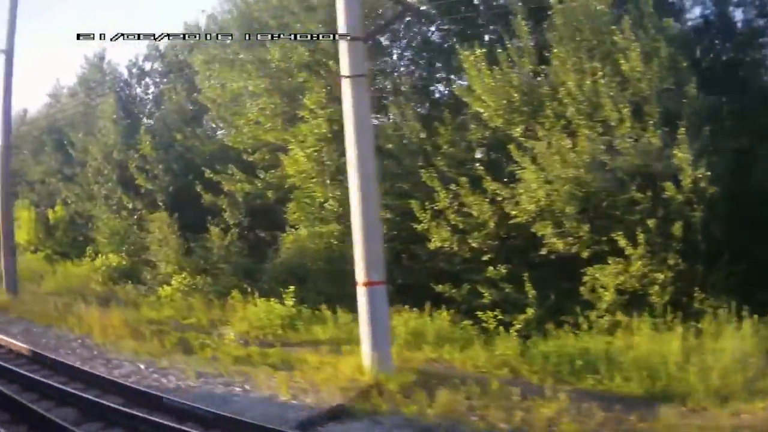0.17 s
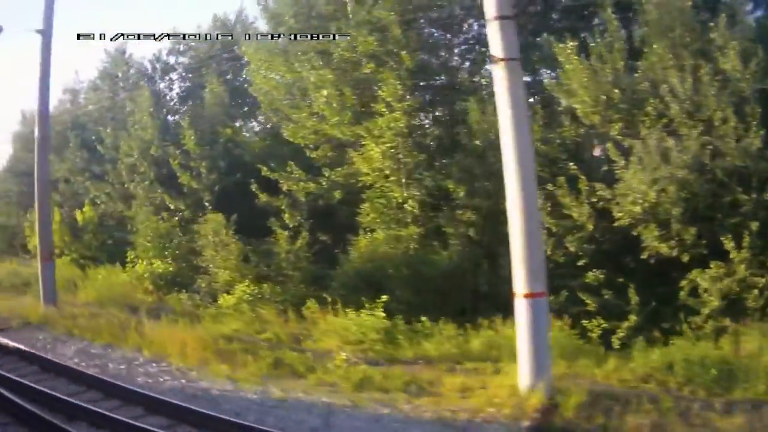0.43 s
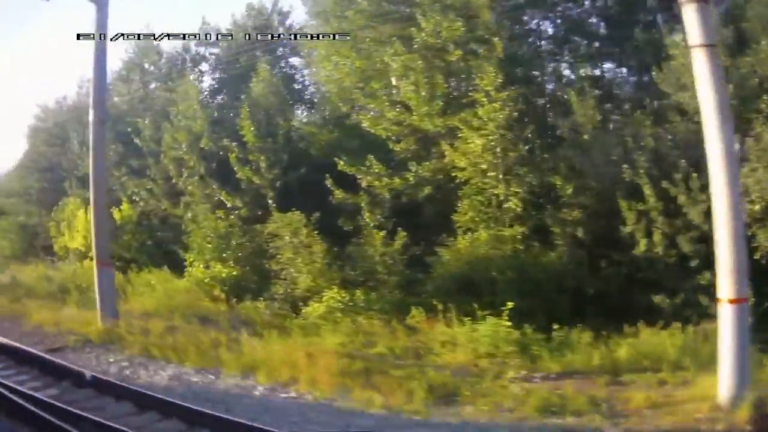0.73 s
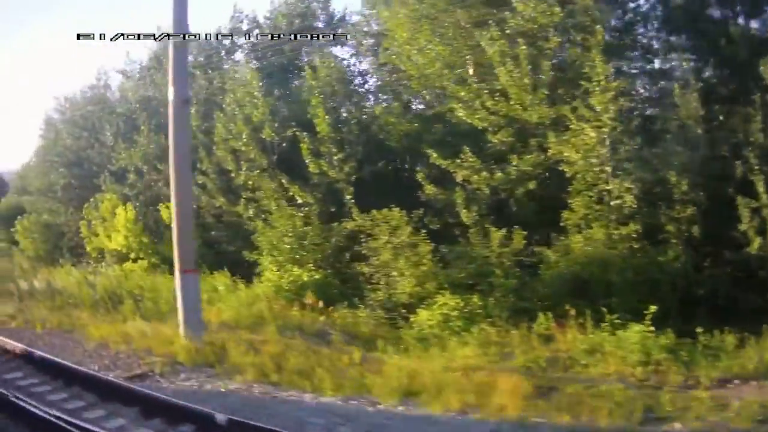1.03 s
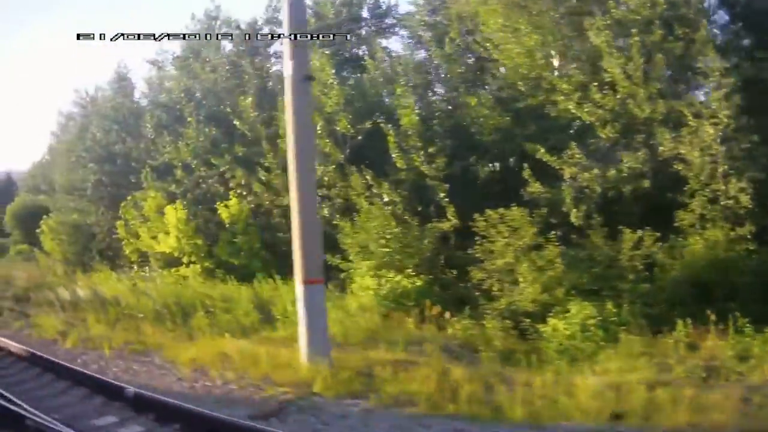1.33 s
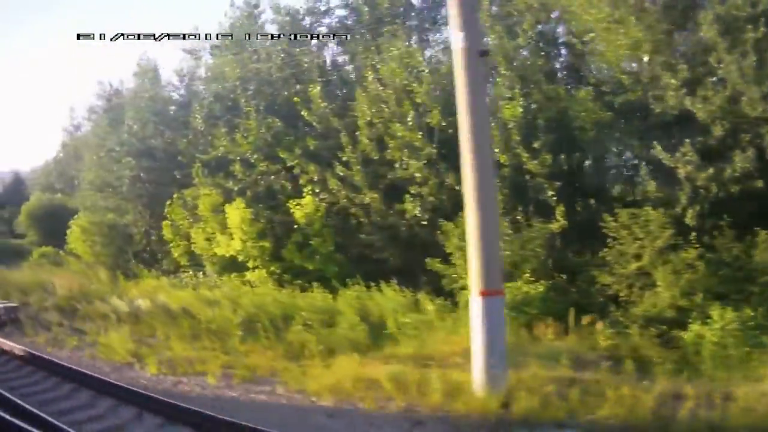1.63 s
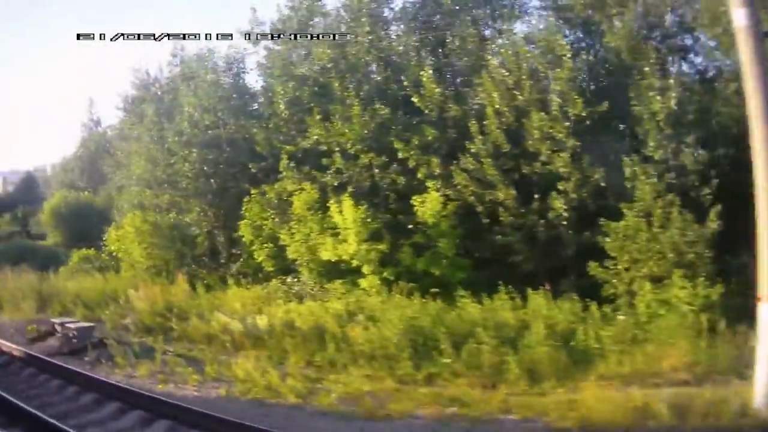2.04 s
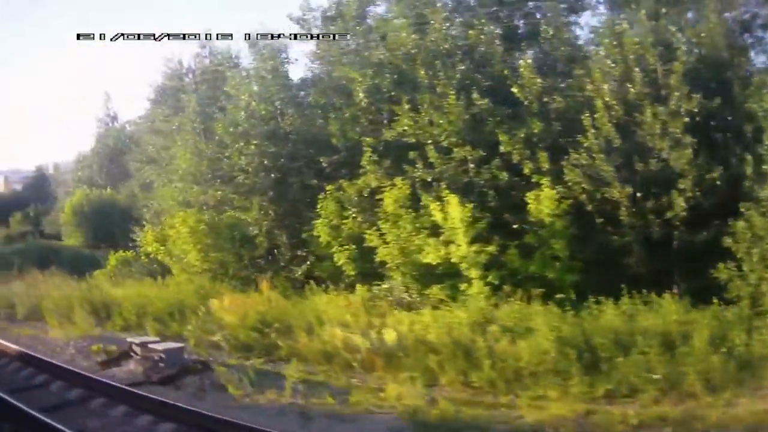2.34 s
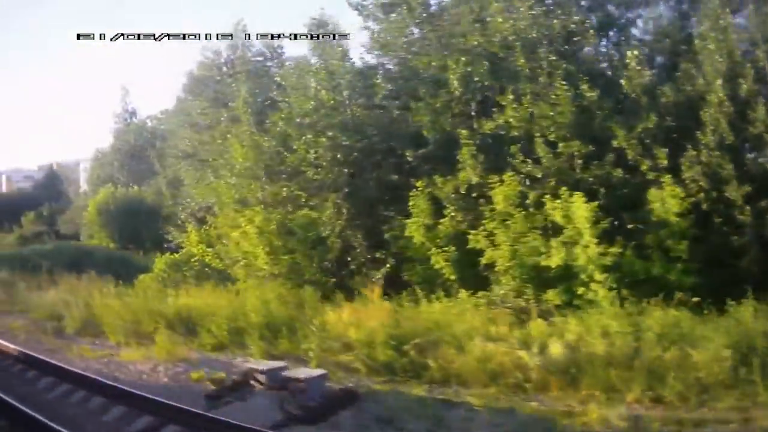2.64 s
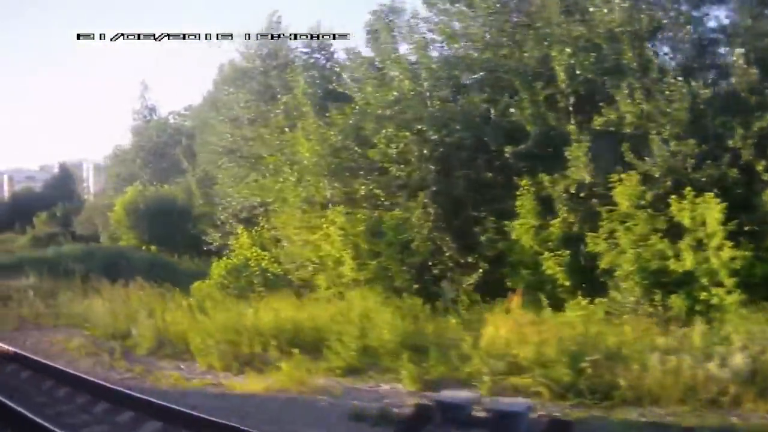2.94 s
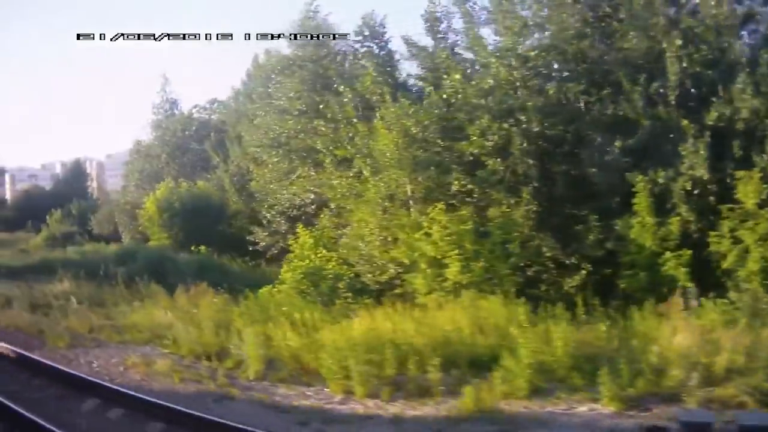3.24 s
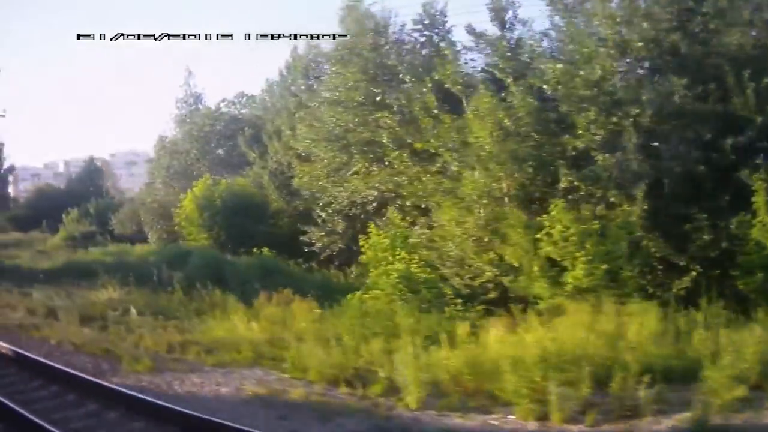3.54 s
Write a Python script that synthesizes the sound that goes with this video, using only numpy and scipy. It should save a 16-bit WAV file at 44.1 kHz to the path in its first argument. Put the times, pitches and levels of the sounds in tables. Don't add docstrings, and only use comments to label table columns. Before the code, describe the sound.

A low rolling train rumble heard from inside, one sharp thud, then small plastic rattles.

```python
import sys
import numpy as np
from scipy import signal
from scipy.fft import rfft, irfft
from scipy.io import wavfile
from scipy.ndimage import uniform_filter1d

SR = 44100
rng = np.random.default_rng(int(sys.argv[2]) if len(sys.argv) > 2 else 0)


def invert_db(level):
    return 10 ** (np.asarray(level, dtype=float) / 20)


def materialize(psi):
    bounded = np.clip(np.atleast_2d(psi).T, -1, 1)
    quanta = np.round(bounded * 32767).astype(np.int16)
    wavfile.write(sys.argv[1], SR, quanta)


N = 163170
T = np.arange(N) / SR

# time in seconds, level in dB.
ROLLING_EFFORT = [(0, -22.5), (.08, -23), (.4, -27.5), (.72, -32), (.84, -27), (1.25, -30.5), (1.38, -28),
                  (1.46, -33.5), (1.54, -31), (2.0, -28), (2.4, -28.5), (2.55, -30), (3.12, -28),
                  (3.25, -33.5), (3.4, -27), (3.7, -28.5)]
# frequency in Hz, density in dB per Hz.
RUMBLE_SPECTRUM = [(18, 1), (108, -8), (234, -22.5), (269, -20.5), (404, -25), (465, -31), (890, -34.5),
                   (1200, -67)]
# frequency in Hz, density in dB per Hz.
WHEEL_HISS_SPECTRUM = [(1000, -4), (1130, 1.5), (1440, -4), (2010, -4), (3020, -2.5), (3380, -12),
                       (3900, -19.5), (4400, -22)]
# frequency in Hz, density in dB per Hz.
DRAUGHT_SPECTRUM = [(3600, -3), (4300, -9), (5500, -7.5), (7000, -6.5), (9200, -8), (10300, -11),
                    (13000, -10), (15000, -10)]
# frequency in Hz, density in dB per Hz.
SIDE_SPECTRUM = [(200, 11), (600, 4.5), (1100, -8), (4000, -1.5), (6000, -0.5), (9000, -2.5), (12000, -4),
                 (14800, -8)]
# frequency in Hz, width in Hz, level in dB.
CABIN_RESONANCES = [(30.74, 5.1, -37), (67.8, 9, -39.5), (273, 16.8, -54), (353, 7.8, -58),
                    (900, 30, -67.5), (2950, 370, -67.5)]
# time in seconds, level in dB.
RUSTLE_LEVEL = [(0, -101), (.06, -88), (.2, -96), (.28, -74), (.4, -85), (.8, -80), (.92, -73), (1.02, -78),
                (1.1, -79.5), (1.45, -77.5), (1.85, -78), (1.93, -82), (2.0, -70), (2.1, -81), (2.8, -80.5),
                (3.2, -80.5), (3.7, -76)]
# start in seconds, thump in dB, panel in dB, crack in dB,
# dullness in dB per kHz.
BODY_BLOWS = [(.097, -24, -23, -72, -1.5), (0.103, -18, -18, -68, -1), (.110, -18, -23, -45, -4.5),
              (.128, -11.5, -17, -31.5, 0.5), (.136, -11, -14.5, -36, -1), (.156, -17, -21, -48.5, -1.5),
              (.167, -16, -33, -43, -4.5), (.190, -21, -42, -46, -1), (.204, -19.5, -33.5, -66, 1.5),
              (.225, -22, -39, -49.5, 1), (.263, -27, -24.5, -66, 10), (.285, -20.5, -26, -60, 11),
              (.31, -27, -28, -66, 12), (3.375, -31, -33, -74, 7), (3.392, -33.5, -40.5, -73, 0),
              (3.405, -31, -39, -53, -3.5), (3.432, -26, -38, -58, 1.5), (3.485, -29.5, -42, -52, -2.5),
              (3.543, -25.5, -32, -53, 7.5), (3.554, -23.5, -30.5, -64, 2), (3.593, -44, -43, -63, 8)]
# frequency in Hz, level in dB, t60 in seconds.
THUMP_MODES = [(69.7, 1, 0.19), (110.1, 1.5, 0.314), (130.8, -1, 0.26), (163.6, 6, 0.18), (213, -2.5, 0.14),
               (216, -3, 0.081), (330, -1, 0.27)]
# frequency in Hz, level in dB, t60 in seconds.
PANEL_MODES = [(429, -11, 0.13), (517, -5, 0.11), (702, 2.5, 0.098), (802, -7, 0.12), (910, -4.5, 0.12),
               (969, -8.5, 0.075), (1137, -13.5, 0.15), (1283, -17, 0.093), (1405, -22, 0.068),
               (587, -16.5, 0.067), (1559, -13, 0.059), (1694, -11, 0.079), (1950, -16, 0.08),
               (2760, -13.5, 0.36)]
# frequency in Hz, density in dB per Hz.
CRACK_SPECTRUM = [(2500, 8), (3500, -4), (4300, -8.5), (6000, -9.5), (7500, -14), (9200, -10.5),
                  (10500, -21), (14500, -38)]
# start in seconds, peak in dB,
# pitch in Hz, treble in dB re peak, t60 in seconds.
TRIM_TICKS = [(.054, -42, 1480, -26, 0.073), (.097, -31, 1650, -48, 0.16), (.257, -40, 2880, -40, 0.33),
              (.3, -44.5, 2950, -45, .3), (.898, -40.5, 1380, -28, .08), (.931, -45, 1680, -20, 0.066),
              (1.004, -41, 1380, -24, .08), (1.111, -39, 2630, -37, 0.046), (1.14, -49, 2730, -40, 0.035),
              (1.145, -38, 1890, -41, 0.055), (1.661, -53, 1290, -28, 0.032),
              (1.806, -33.5, 2070, -48, 0.024), (1.812, -38.5, 2350, -21, 0.094),
              (1.894, -41, 2170, -36, 0.12), (2.407, -46.5, 2800, -30, .04),
              (2.686, -31.5, 650, -32.5, 0.058), (2.687, -40, 1200, -50, 0.058),
              (2.691, -42, 1580, -40, 0.046), (2.804, -41, 2600, -29, .08), (2.927, -40.5, 2950, -57, 0.41),
              (2.948, -41, 2000, -30, 0.074), (2.969, -41.5, 1560, -25, 0.069),
              (3.011, -39, 2310, -38, 0.11), (3.111, -39, 2570, -46, 0.047), (3.125, -48, 1290, -19, 0.065),
              (3.404, -37.5, 2010, -24, .1), (3.415, -38, 2150, -28, .1), (3.428, -41, 1560, -30, .1),
              (3.457, -42, 2540, -28, .08), (3.464, -38, 2950, -28, 0.13), (3.485, -40.5, 2850, -25, .08),
              (3.529, -48, 2580, -22, .08), (3.537, -39.5, 2700, -38, 0.11), (3.593, -48, 2950, -25, 0.054)]
# start in seconds, pitch in Hz, level in dB, t60 in seconds.
METAL_RING = (1.812, 9400, -54, .06)
# frequency in Hz, density in dB per Hz.
SNAP_SPECTRUM = [(500, 6.5), (1200, -4.5), (2500, -6), (3400, -10.5), (4200, -26.5)]
# frequency in Hz, density in dB per Hz.
EDGE_SPECTRUM = [(4500, -14), (6500, -10.5), (7600, -8), (9200, -6), (10500, -16.5), (14000, -31)]
# start in seconds, level in dB, t60 in seconds.
PANEL_TAPS = [(.56, -52, .3), (.605, -54, .2), (.63, -53, .15), (.65, -50, .2), (1.388, -42, .3),
              (1.44, -55, .4), (1.478, -51, .4), (1.518, -49, .5), (1.99, -52, .2), (2.371, -33, .07),
              (2.402, -30, .07), (2.432, -32, .07), (2.467, -34, .06), (2.492, -32, .08), (2.521, -32, .1),
              (2.548, -39, .12), (2.571, -39, .06), (3.4, -50, .2)]
# frequency in Hz, level in dB.
LOOSE_PANEL_MODES = [(903, 0), (868, -12), (938, -14), (740, -10)]
# start in seconds, length in seconds, pitch in Hz, level in dB,
# fall in Hz per second.
TRIM_SQUEAKS = [
    (3.258, .038, 7830, -62, 1500),
    (3.533, .028, 4580, -65, 1500),
    (3.552, .03, 4330, -74, 1000),
    (3.535, .04, 9200, -63, 5000),
    (3.537, .02, 8600, -65, 0),
]
# start in seconds, first pitch in Hz, last pitch in Hz, level in dB,
# t60 in seconds.
FLOOR_FLEX = [
    (.093, 99.5, 78, -19.5, 0.71),
    (.128, 174.5, 38, -7.5, 0.52),
    (.245, 85, 50.5, -17.5, 0.32),
    (3.372, 185, 125, -21.5, 0.5),
    (3.12, 116.7, 107, -23, 0.86),
]
CONVERTER_OFFSET = [
    [-.0195],
    [.0182],
]


def level(x, db=0):
    return x * invert_db(db) / np.sqrt(np.mean(x ** 2))


def octaves():
    return np.log2(np.maximum(np.arange(N // 2 + 1) * SR / N, 1))


def shape(points, slope_db=40):
    hz, db = np.array(points).T
    f, knots = octaves(), np.log2(hz)
    beyond = np.maximum(knots[0] - f, 0) + np.maximum(f - knots[-1], 0)
    return invert_db(np.interp(f, knots, db) - slope_db * beyond)


def walk(rate):
    k = int(SR / rate)
    held = np.repeat(rng.standard_normal(N // k + 1), k)
    return 1.27 * uniform_filter1d(uniform_filter1d(held, k), k)[:N]


def noise(points, flicker_db, rate):
    spectrum = rfft(rng.standard_normal(N)) * shape(points)
    f, out = octaves(), 0
    for centre in range(int(np.log2(points[0][0])) - 1, int(np.log2(points[-1][0])) + 3):
        one_band = irfft(spectrum * np.clip(1 - abs(f - centre), 0, 1), N)
        out = out + invert_db(flicker_db * walk(rate)) * one_band
    return out


def burst(points, envelope):
    gain = shape(points)
    spectrum = rfft(rng.standard_normal(N) * envelope)
    return irfft(spectrum * gain / np.sqrt(np.mean(gain ** 2)), N)


def band(x, hz, width_hz):
    b, a = signal.iirpeak(hz, hz / width_hz, SR)
    return signal.lfilter(b, a, signal.lfilter(b, a, x))


def ring(x, hz, t60):
    pole = np.exp(2j * np.pi * hz / SR - np.log(1000) / (t60 * SR))
    return signal.lfilter([1], [1, -pole], x).imag


def strikes(times, gains):
    x = np.zeros(N)
    np.add.at(x, np.clip((np.asarray(times) * SR).astype(int), 0, N - 1), gains)
    return x


def fade(x, t60):
    return signal.lfilter([1], [1, -np.exp(-np.log(1000) / (t60 * SR))], x)


def side_hiss():
    return level(noise(SIDE_SPECTRUM, 2.0, 15), -75)


def draught():
    hiss = level(noise(DRAUGHT_SPECTRUM, 1.4, 12), -70.5)
    top = signal.sosfiltfilt(signal.butter(6, 12800, "high", fs=SR, output="sos"), hiss)
    puff_s, puff_length_s, puff_db, flutter_db = 2.33, 0.049, 9, 7
    puff = np.exp(-((T - puff_s) / puff_length_s) ** 4)
    top_gain = invert_db(-flutter_db * walk(45) * puff - 7 + puff_db * puff)
    return (hiss - top) * invert_db(puff_db * puff / 2) + top * top_gain


def rolling():
    mid_share, hiss_share = 0.69, 0.46
    effort = np.interp(T, *np.array(ROLLING_EFFORT).T)
    mean = effort.mean()
    swell = effort - mean
    low = level(noise(RUMBLE_SPECTRUM, 0.73, 5.9), mean)
    b, a = signal.butter(1, 200, fs=SR)
    boom = signal.filtfilt(b, a, low)
    out = boom * invert_db(swell) + (low - boom) * invert_db(mid_share * swell)
    for hz, width_hz, db in CABIN_RESONANCES:
        resonance = level(band(rng.standard_normal(N), hz, width_hz), db)
        out = out + resonance * invert_db(3.1 * walk(4.015))
    wheel_hiss = level(noise(WHEEL_HISS_SPECTRUM, 2.7, 13), -57)
    return out + wheel_hiss * invert_db(hiss_share * swell)


def rustle():
    grains = rng.standard_normal(N) * invert_db(3.3 * walk(90))
    treble = level(band(grains, 8530, 2300))
    return treble * invert_db(np.interp(T, *np.array(RUSTLE_LEVEL).T) + 2.5)


def squeaks():
    out = 0
    for start, length, hz, db, fall in TRIM_SQUEAKS:
        u = np.clip((T - start) / length, 0, 1)
        pitch = hz * (1 + 0.0066 * walk(400)) - fall * length * u
        gain = invert_db(db + 7 + 3.5 * walk(250)) * np.sin(np.pi * u ** 0.6)
        out = out + gain * np.sin(2 * np.pi * np.cumsum(pitch) / SR)
    return out


def buzz():
    edge_s, wobble = 0.007, 0.005
    gain, tone = 0, 0
    for start, db, t60 in PANEL_TAPS:
        u = np.maximum(T - start, 0)
        gain = gain + invert_db(db - 60 * u / t60) * (1 - np.exp(-u / edge_s))
    for hz, db in LOOSE_PANEL_MODES:
        phase = 2 * np.pi * hz * np.cumsum(1 + wobble * walk(40.25)) / SR
        tone = tone + invert_db(db) * np.sin(phase)
    return gain * tone


def ticks():
    contact = 14
    out, t = np.zeros(N), T[:SR // 10]
    for start, db, hz, _, t60 in TRIM_TICKS:
        rattle = (rng.standard_normal(len(t)) + contact * (t == 0)) * np.exp(-np.log(1000) * t / t60)
        rung = band(rattle, hz, hz * 0.27)
        i = int(start * SR)
        out[i:i + len(t)] += rung / abs(rung).max() * invert_db(db - 3.5)
    start, hz, db, t60 = METAL_RING
    out += ring(strikes([start], invert_db(db)), hz, t60)
    starts, peak_db, _, treble_db, _ = np.array(TRIM_TICKS).T
    out += burst(SNAP_SPECTRUM, fade(strikes(starts, invert_db(peak_db - 9.5)), 0.045))
    edge = fade(strikes(starts, invert_db(peak_db + treble_db + 3.5)), 0.092)
    return out + burst(EDGE_SPECTRUM, uniform_filter1d(edge, size=150))


def flex():
    sag_s, out = 0.0261, 0
    for start, hz, end_hz, db, t60 in FLOOR_FLEX:
        u = np.maximum(T - start, 0)
        phase = 2 * np.pi * (end_hz * u + (hz - end_hz) * sag_s * (1 - np.exp(-u / sag_s)))
        out = out + invert_db(db - 60 * u / t60) * (1 - np.exp(-u / 0.003)) * np.sin(phase)
    return out


def struck_modes(modes, starts, db, dull, push_s):
    mix = rng.standard_normal((len(starts), len(modes), 2))
    push = np.hanning(max(int(push_s * SR), 3))
    out = 0
    for k, (hz, mode_db, t60) in enumerate(modes):
        scatter_db = 2.5 * mix[:, k, 1]
        gains = np.sign(mix[:, k, 0]) * invert_db(db + mode_db - dull * hz / 1000 + scatter_db)
        pushes = np.convolve(strikes(starts, gains), push / push.sum())[:N]
        out = out + ring(pushes, hz, t60)
    return out


def blows():
    starts, thump, panel, crack, dull = np.array(BODY_BLOWS).T
    out = struck_modes(THUMP_MODES, starts, thump - 8, dull, push_s=0.002)
    out = out + struck_modes(PANEL_MODES, starts, panel - 2, dull, push_s=0.00068)
    hit = strikes(starts, invert_db(crack))
    out = out + burst(CRACK_SPECTRUM, fade(hit, 0.018) + invert_db(-21) * fade(hit, 0.23))
    shudder_spectrum = [(300, 7.5), (1000, -1.5), (1800, -9.5), (3200, -16.5)]  # Hz, dB per Hz
    shaken = strikes(starts, invert_db(panel - 0.45 * dull - 11.5))
    return out + burst(shudder_spectrum, invert_db(-10.5) * fade(shaken, 0.28))


def scene():
    background = draught() + rolling() + rustle()
    mid = background + squeaks() + buzz() + ticks() + flex() + blows()
    side = side_hiss()
    return np.array([mid + side, mid - side])


def top_cut(x):
    return signal.sosfilt(signal.butter(12, 15100, fs=SR, output="sos"), x)


def record(dry):
    rounded = np.tanh(1.103 * dry) / 1.083
    return top_cut(rounded + CONVERTER_OFFSET)


dry = scene()
out = record(dry)
materialize(out)
```